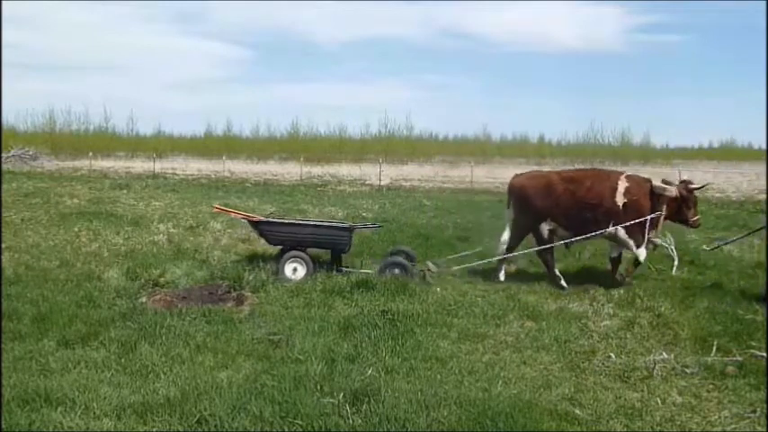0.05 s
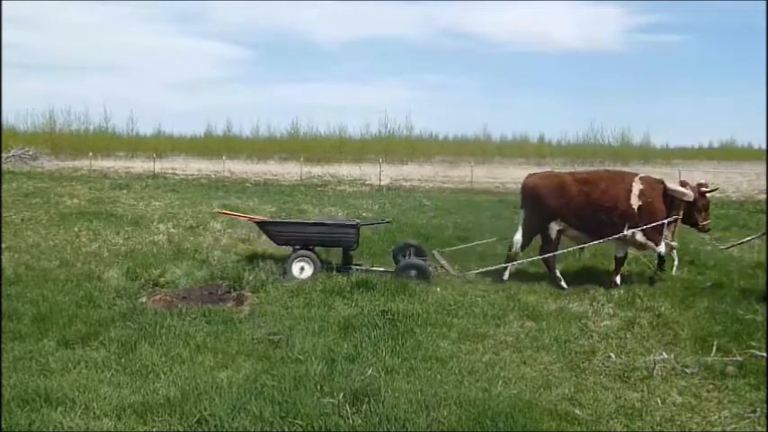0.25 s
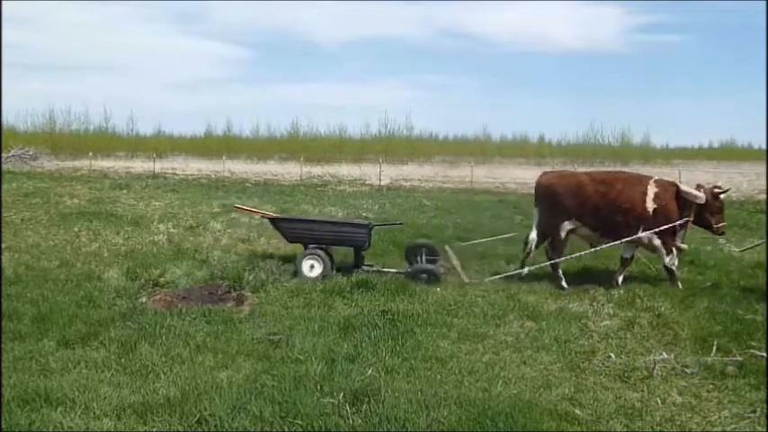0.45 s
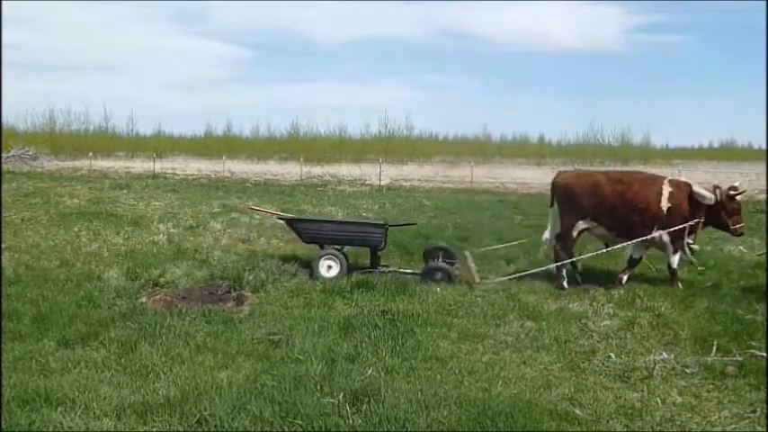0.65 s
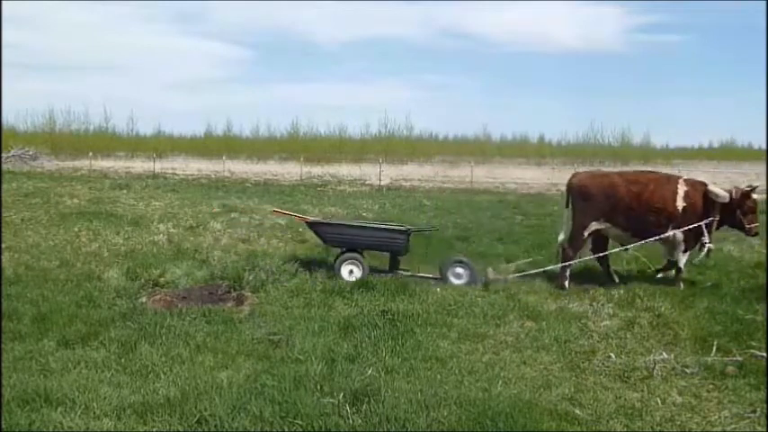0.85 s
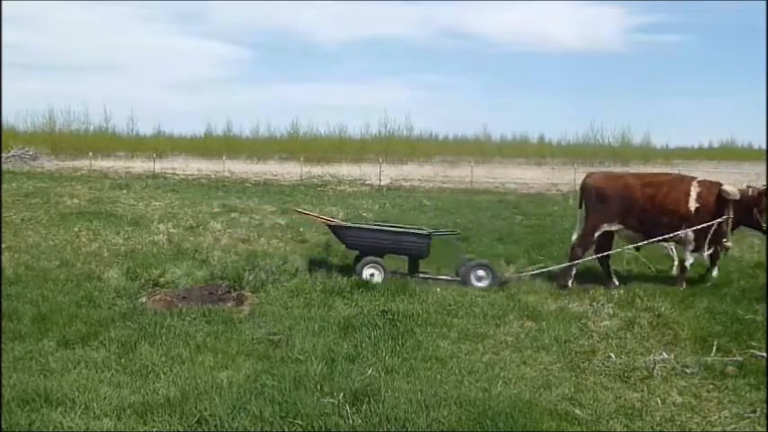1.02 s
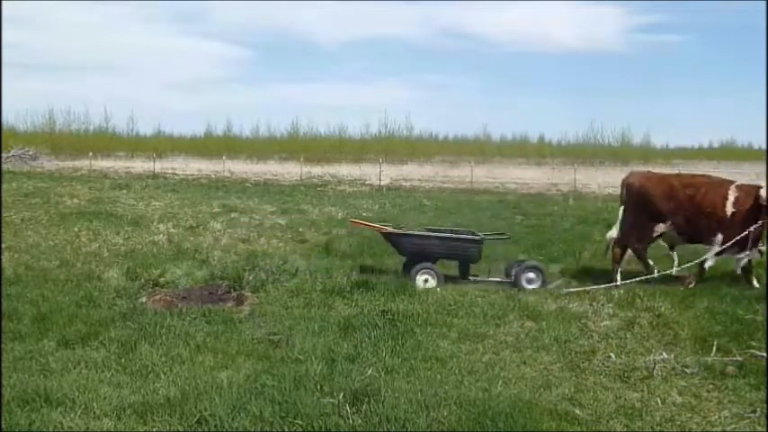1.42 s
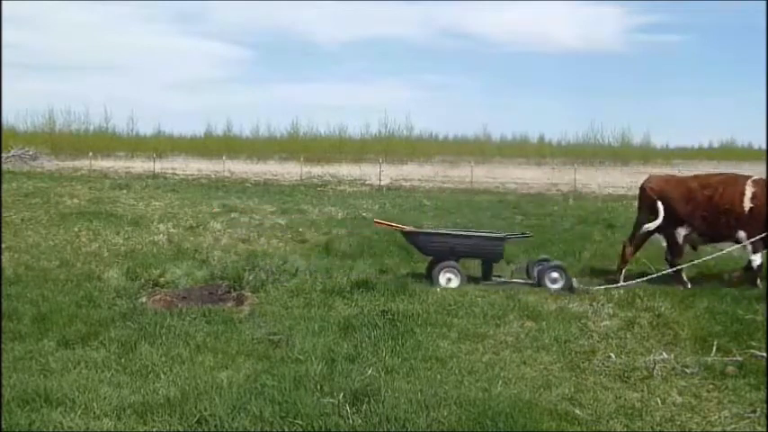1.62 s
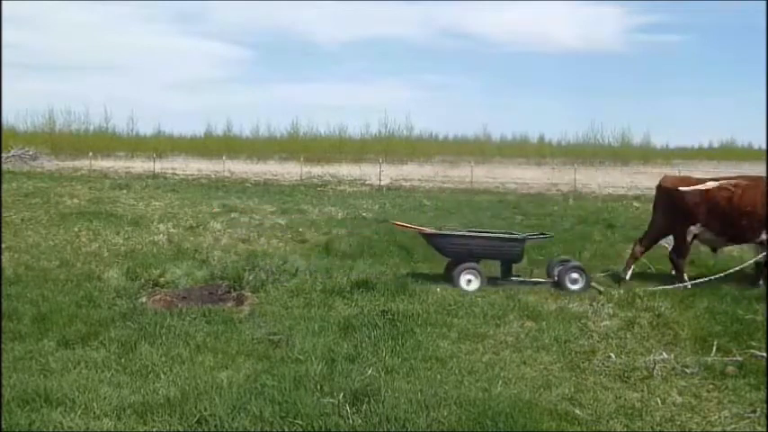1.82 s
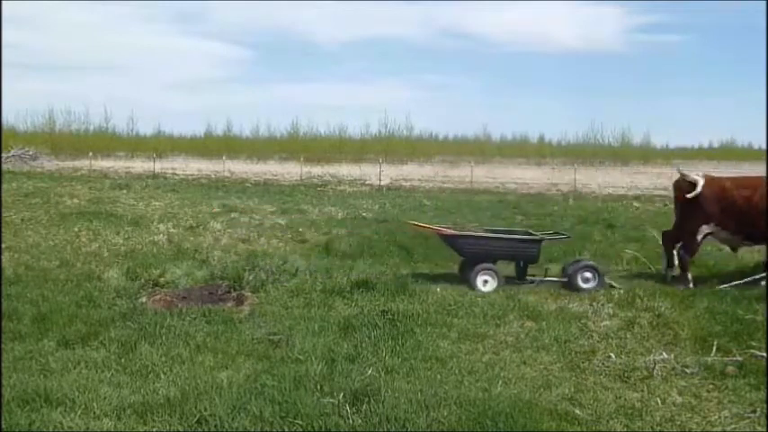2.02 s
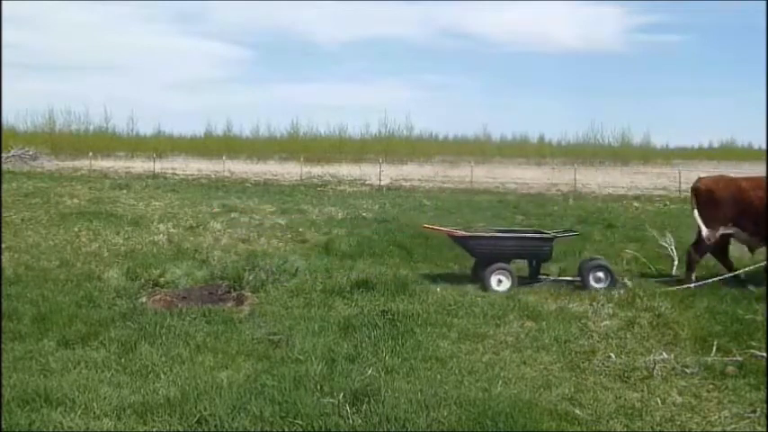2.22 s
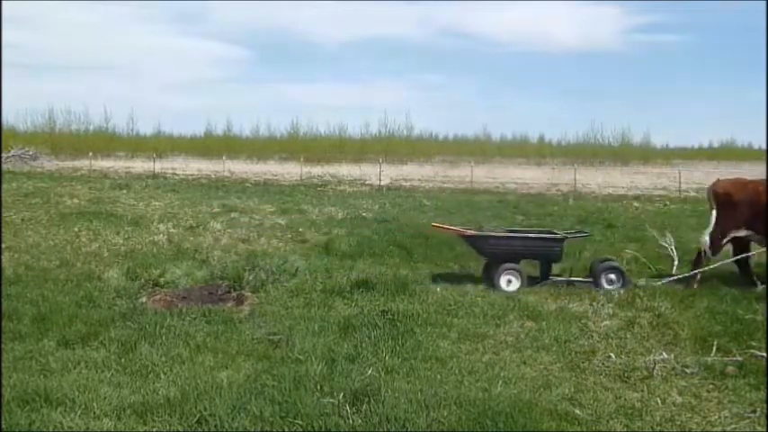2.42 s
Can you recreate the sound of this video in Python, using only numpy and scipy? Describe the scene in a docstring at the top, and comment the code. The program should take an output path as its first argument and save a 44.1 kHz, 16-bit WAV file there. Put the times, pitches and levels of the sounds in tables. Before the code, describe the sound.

A small cart clanks and rattles as an ox pulls it over crackling grass, some way off in an open field. Wind rumbles and pops on the microphone, strongest early, then the clatter grows busier. Birds chirp faintly.

```python
"""A small tub cart clanks and rattles as an ox pulls it over grass, some way off in an open field.
Impacts excite the modes of its frame and make the tub boom; steel fittings ping, and stalks crackle
under wheels and hooves. Turbulent wind rumbles, flutters and pops on the microphone, overloading it
at its strongest. Birds whistle and chirp faintly."""
import sys
import numpy as np
from scipy import signal
from scipy.fft import rfft, irfft
from scipy.io import wavfile
from scipy.ndimage import uniform_filter1d

SR = 44100
rng = np.random.default_rng(int(sys.argv[2]) if len(sys.argv) > 2 else 0)


def log_audio(samples):
    """Write samples as a 16-bit WAV file to the path given in sys.argv[1]."""
    # one column per channel
    frames = np.atleast_2d(samples).T
    # limit to full scale, then quantise
    limited = np.clip(frames, -1, 1)
    pcm = np.round(limited * 32767).astype(np.int16)
    wavfile.write(sys.argv[1], SR, pcm)


N = 112454
T = np.arange(N) / SR

# spectrum of the bright edge of steel contacts (frequency [Hz], level [dB])
EDGE_SPECTRUM = [(2000, -35.5), (4200, 5.5), (5000, 8.5), (6000, 7), (7400, 1.5), (8200, -25)]
# spectrum of rough turbulence on the microphone (frequency [Hz], level [dB])
TURBULENCE_SPECTRUM = [(50, -25), (110, -4.5), (170, 1), (240, 3), (320, -6.5), (420, -21), (600, -31),
                       (1000, -54.5), (2500, -69)]


def undb(db):
    """Decibels to amplitude ratio."""
    return 10 ** (np.asarray(db) / 20)


def unit(x):
    """Normalisation to rms 1."""
    return x / np.sqrt(np.mean(x ** 2))


def curve(rows, column=1):
    """Linear interpolation of a table column over time."""
    rows = np.array(rows)
    return np.interp(T, rows[:, 0], rows[:, column])


def colour(x, spectrum):
    """Spectral shaping by (frequency [Hz], level [dB]) points, to rms 1."""
    hz, db = np.array(spectrum).T
    bin_hz = np.maximum(np.fft.rfftfreq(N, 1 / SR), 1)
    gain = undb(np.interp(np.log(bin_hz), np.log(hz), db))
    return unit(irfft(rfft(x) * gain, N))


def noise():
    """Gaussian white noise."""
    return rng.standard_normal(N)


def walk(rate_hz):
    """Smooth random fluctuation of rms 1."""
    step = max(int(SR / rate_hz), 1)
    return unit(uniform_filter1d(noise()[np.arange(N) // step], step))


def spell(start, length, edge_s):
    """Trapezoidal envelope: rise, hold and fall."""
    return np.clip((T - start) / edge_s + .5, 0, 1) * np.clip((start + length - T) / edge_s + .5, 0, 1)


def strike(start, attack_s, t60_s):
    """Impact envelope: linear rise, exponential decay."""
    age = np.maximum(T - start, 0)
    return np.minimum(age / attack_s, 1) * np.exp(-np.log(1000) * np.maximum(age - attack_s, 0) / t60_s)


def grains(per_s, spread_db):
    """Shot noise: dense tiny contacts of unequal size."""
    hit = rng.random(N) < per_s / SR
    return unit(hit * noise() * undb(spread_db * np.minimum(rng.exponential(size=N), 4)))


def convolve(x, response):
    """Convolution with the first quarter second of an impulse response, scaled to unit energy."""
    response = response[:SR // 4]
    return signal.fftconvolve(x, response / np.linalg.norm(response))[:N]


def scattered(x):
    """Scattering by ground and brush adds a short smear to a distant sound."""
    return x + undb(-1) * convolve(x, noise() * strike(0, attack_s=0.00097, t60_s=0.054))


def grass():
    """Stalks crackling under wheels and hooves sum to shot noise, over the even hiss of the field."""
    # strength of the rustle (time [s], level [dB])
    rolling = [(0, -42), (.2, -48), (.32, -47.5), (.44, -43.5), (.55, -56.5), (.85, -54), (1.0, -46),
               (1.3, -43.5), (1.4, -50), (1.7, -41), (1.83, -45.5), (2.05, -44.5), (2.3, -47),
               (2.55, -49.5)]
    # spectra of the stalks and of the hiss (frequency [Hz], level [dB])
    stalk_spectrum = [(300, 6), (600, 3), (1200, -1.5), (2000, -6), (3300, -9.5), (5000, -12),
                      (7000, -14.5), (8200, -28.5)]
    field_spectrum = [(100, -6.5), (400, 3.5), (1200, -2), (2000, -3), (3500, -7), (6000, -1.5),
                      (8000, -12.5)]
    crackle = colour(grains(per_s=5000, spread_db=1), stalk_spectrum)
    rustle = crackle * undb(curve(rolling) + 0.48 * walk(50))
    return rustle + undb(-61) * colour(noise(), field_spectrum)


def wind_rumble():
    """Turbulent pressure on the microphone rumbles; its rough part grows faster than the rumble does."""
    # strength of the rumble (time [s], level [dB])
    strength = [(0, -35.5), (.15, -34), (.22, -27.5), (.26, -33.5), (.4, -25.5), (.6, -24), (.7, -34),
                (.79, -29), (.9, -30), (1.1, -28.5), (1.2, -24.5), (1.26, -33.5), (1.33, -26.5), (1.4, -31),
                (1.46, -27), (1.73, -28), (1.8, -32), (1.91, -28.5), (1.98, -38.5), (2.1, -37), (2.23, -31),
                (2.32, -41), (2.45, -32.5), (2.55, -37.5)]
    # spectrum of the rumble (frequency [Hz], level [dB])
    spectrum = [(15, 2), (30, -15), (60, 0.5), (120, 2), (180, -5.5), (260, -22.5), (400, -30), (800, -63)]
    rough_growth, reference_db = 2.87, -28.5  # growth in dB per dB of rumble
    rumble_db = curve(strength) + 1.13 * walk(30.18)
    rough_db = -40 + rough_growth * (rumble_db - reference_db)
    rough = undb(rough_db) * colour(noise(), TURBULENCE_SPECTRUM)
    return undb(rumble_db) * colour(noise(), spectrum) + rough


def cart():
    """Impact excitation: blows and rattles sound steel and tub; a blow rings modes near its note most."""
    # blows of hitch and tub (time [s], level [dB], relative tub boom [dB], relative bright edge [dB],
    # note [Hz], relative ring [dB])
    clanks = [(0.017, -41, -26, -2, 2530, 3), (0.269, -54.5, 17, -14, 1500, 7.5),
              (0.441, -39.5, 10, -25, 3560, -9.5), (0.603, -43.5, -15, -2, 3205, -10.5),
              (.874, -57.5, 17, -10, 1160, 9), (1.02, -38, -17, -5, 2630, -2),
              (1.078, -45, -15, -3, 6540, -21), (1.088, -34.5, -11, -15.5, 2920, -2),
              (1.103, -46, 12, -16, 1160, 6), (1.238, -35, -1.5, -16, 1160, 3.5),
              (1.253, -40.5, 10, -11, 1230, -5), (1.296, -46, -9, -13, 3060, -12),
              (1.395, -46.5, 2, -11, 6000, -4.5), (1.435, -34, -24, -9, 3560, 0),
              (1.444, -37.5, 5.5, -2.5, 6540, -4.5), (1.484, -38.5, -4, -14, 4810, -5),
              (1.508, -32.5, 2.5, -10, 3060, -3.5), (1.582, -39, 3, 4, 5400, 1.5),
              (1.594, -44, 1, -13, 4525, 1), (1.624, -40.5, 11, -22, 1540, 1),
              (1.648, -45.5, 11, -22, 3205, 3), (1.672, -42.5, 8, -17, 1230, 9.5),
              (1.7, -30, 0, -3, 3205, 1), (1.706, -32, 5, -6, 4525, -2.5), (1.74, -38, 11, -4, 1490, -6.5),
              (1.798, -46, -16, -3, 4810, -7), (1.883, -30.5, 0, -3, 5070, -6),
              (1.979, -40.5, 2.5, -15, 1230, 5), (2, -37.5, -10, -7, 2920, 1),
              (2.021, -37.5, 0, -8, 3205, 1), (2.048, -40, 4, -24, 2550, -3), (2.152, -38, 0, 1.5, 3560, 2),
              (2.155, -42, -12, -14, 1500, 11.5), (2.185, -43.5, 9, 0, 6460, -1),
              (2.25, -50, -6, 6, 4810, 2), (2.496, -44.5, -2, 6, 5290, 0)]
    # loose rattling as the wheels jolt (time [s], duration [s], level [dB])
    rattles = [(0.177, 0.03, -50.5), (1.113, 0.021, -47.5), (1.464, 0.082, -45.5), (1.583, 0.1, -42),
               (1.725, 0.028, -37.5), (1.861, 0.041, -45.5), (2.16, 0.028, -44.5)]
    # modes of the frame (frequency [Hz], level [dB])
    frame_modes = [(1160, 14.5), (1230, 2), (1540, 9.5), (2550, 0.5), (2920, 7), (3060, -8), (3205, 6.5),
                   (3560, -2.5), (4525, -4.5), (4810, -2.5), (5070, -10), (5900, -7.5), (6540, -4)]
    # spectra of the steel's clatter and the tub's boom (frequency [Hz], level [dB])
    steel_spectrum = [(500, -4), (1500, 7), (2400, 9.5), (3300, 12), (4600, 6), (6000, -1), (7300, -20),
                      (8200, -32.5)]
    tub_spectrum = [(250, 1.5), (500, -2), (900, -11.5), (1200, -6.5), (1700, -14.5), (2400, -17),
                    (4000, -26.5), (8000, -53)]
    attack_s, mode_width_hz, excited_half_width_hz = 0.0013, 68, 110
    steel_power, tub_power, edge_power, struck = np.zeros((4, N))
    mode_hz, mode_db = np.array(frame_modes).T
    modes = np.sin(2 * np.pi * (mode_hz[:, None] * T + rng.random((len(mode_hz), 1))))
    for start, db, boom_db, edge_db, note_hz, ring_db in clanks:
        blow = lambda t60_s: undb(db) * strike(start, attack_s, t60_s)
        steel_power += blow(t60_s=0.08) ** 2
        tub_power += (undb(boom_db) * blow(t60_s=0.14)) ** 2
        edge_power += (undb(edge_db) * blow(t60_s=0.058)) ** 2
        share = undb(mode_db) / (1 + ((mode_hz - note_hz) / excited_half_width_hz) ** 2)
        ring = blow(t60_s=0.085) * (share / np.linalg.norm(share) @ modes)
        clack = undb(-3) * blow(t60_s=0.033) * np.sin(2 * np.pi * note_hz * (T - start))
        struck += undb(ring_db) * (clack + ring)
    for start, length, db in rattles:
        shake = undb(db) * spell(start, length, edge_s=0.0087)
        steel_power += shake ** 2
        tub_power += (undb(4.5) * shake) ** 2
    chatter = unit(undb(0.78 * walk(261.6)))
    steel = np.sqrt(steel_power) * colour(grains(per_s=2200, spread_db=1), steel_spectrum)
    frame_response = undb(mode_db) @ modes * np.exp(-np.pi * mode_width_hz * T)
    frame = undb(-5.5) * convolve(np.sqrt(steel_power) * noise(), frame_response)
    edge = np.sqrt(edge_power) * colour(noise(), EDGE_SPECTRUM)
    tub = np.sqrt(tub_power) * colour(grains(per_s=3300, spread_db=3), tub_spectrum)
    return chatter * (steel + edge + tub) + frame + struck


def eddy_pops():
    """Each eddy on the microphone is a pressure transient: two damped tones and a puff of noise. A small knock
    on the tub at 1.845 s is made the same way."""
    # eddies, and at 1.845 s a small knock on the tub (time [s], level [dB], frequency [Hz], relative level of
    # upper tone and puff [dB])
    eddies = [(.02, -32.5, 328, -17), (0.444, -8, 192, -7.5), (0.513, -15.5, 185, -11.5),
              (0.566, -27, 258, -3.5), (.608, -6, 221, -15), (.874, -20.5, 179, -7.5),
              (1.002, -15.5, 203, -8.5), (1.084, -14, 115.5, -42), (1.163, -23.5, 175, -1.5),
              (1.184, -17, 206, -2.5), (1.288, -13.5, 223, -8), (1.31, -19, 147, -24),
              (1.468, -19, 279, -13.5), (1.609, -8, 206, -1), (1.621, -21.5, 229, -3),
              (1.845, -33, 310, -1), (1.902, -18, 145, -25), (1.928, -17.5, 115, -25),
              (2.247, -21, 93, -22), (2.259, -14, 208, 0.5), (2.431, -21.5, 109, -16),
              (2.491, -22, 99, -33)]
    # spectrum of the puff (frequency [Hz], level [dB])
    puff_spectrum = [(150, -16.5), (400, 0), (700, 1.5), (900, -7.5), (1500, -17), (4000, -58.5)]
    rises_s, upper_ratio = (0.0033, 0.0027), 1.797
    puff = undb(-13.5) * colour(noise(), puff_spectrum)
    out = np.zeros(N)
    for start, db, hz, upper_db in eddies:
        age = np.clip(T - start, 0, .2)
        low_pulse, upper_pulse = (age / rise * np.exp(1 - age / rise) for rise in rises_s)
        phase = 2 * np.pi * hz * age
        upper = undb(upper_db) * upper_pulse * (np.sin(upper_ratio * phase) + puff)
        out += undb(db) * (low_pulse * np.sin(phase) + upper)
    return out


def bird_whistles():
    """Fast random frequency modulation makes a far bird's falling whistles husky."""
    # whistles (time [s], duration [s], first frequency [Hz], last frequency [Hz], level [dB])
    whistles = [(0.042, 0.084, 3850, 3140, -54), (0.152, 0.076, 4080, 4044, -46.5),
                (0.214, 0.037, 3790, 2860, -53), (0.345, 0.048, 4100, 3000, -56),
                (2.077, 0.13, 4070, 3945, -57)]
    waver = 1 + .021 * walk(1000)
    out = np.zeros(N)
    for start, length, from_hz, to_hz, db in whistles:
        hz = np.interp(T, [start, start + length], [from_hz, to_hz]) * waver
        out += undb(db) * spell(start, length, edge_s=0.028) * np.sin(2 * np.pi * np.cumsum(hz) / SR)
    return out


def fittings():
    """Damped vibration: each small steel part scrapes and pings on one slightly unsteady note."""
    # pings (time [s], frequency [Hz], level [dB], 60 dB decay time [s], attack [s])
    pings = [(0.07, 7165, -34, 0.052, 0.0023), (0.603, 7000, -46, 0.072, 0.0016),
             (1.166, 5444, -39, 0.15, 0.0096), (1.669, 7130, -44.5, 0.089, 0.0049)]
    phase_per_hz = 2 * np.pi * np.cumsum(1 + 0.0064 * walk(250)) / SR
    scrape = undb(-15.5) * colour(noise(), EDGE_SPECTRUM)
    return sum(undb(db) * strike(start, attack, t60) * (np.sin(hz * phase_per_hz) + scrape)
               for start, hz, db, t60, attack in pings)


def gust_flutter():
    """Gusts make the pressure on the microphone oscillate at a wandering rate, amid turbulence."""
    # gusts (time [s], duration [s], level [dB], flutter [Hz], relative turbulence [dB])
    gusts = [(0.314, 0.044, -13.5, 145, -12), (0.362, 0.017, -20, 165, -35),
             (0.419, 0.029, -12, 160, -10.5), (0.47, 0.0694, -16.5, 172.5, -3.5),
             (0.546, 0.048, -22, 197.8, 1.5), (0.763, 0.074, -27.5, 171.2, -26),
             (1.7, 0.029, -20, 133.9, -3)]
    phase_per_hz = 2 * np.pi * np.cumsum(np.exp(0.1533 * walk(260))) / SR
    surge = unit(undb(0.5 * walk(110)))
    rough = colour(noise(), TURBULENCE_SPECTRUM)
    out = np.zeros(N)
    for start, length, db, hz, rough_db in gusts:
        flutter = np.sqrt(2) * surge * np.sin(hz * phase_per_hz)
        out += undb(db) * spell(start, length, edge_s=0.0059) * (flutter + undb(rough_db) * rough)
    return out


def bird_chirp():
    """A near bird's short chirp is a harmonic series on a rising, then falling fundamental."""
    # course of the chirp (time [s], frequency [Hz], level [dB])
    contour = [(.749, 2230, -64), (.756, 2237, -38.5), (.768, 2300, -35.5), (.785, 2316, -46.5),
               (.805, 2220, -57)]
    # harmonics from the fundamental upward (relative level [dB])
    harmonics = [0, -12.5, -23]
    hz = curve(contour) * (1 + 0.0051 * walk(280))
    phase = 2 * np.pi * np.cumsum(hz) / SR
    tone = sum(undb(db) * np.sin(k * phase) for k, db in enumerate(harmonics, 1))
    sounding = (T > contour[0][0]) & (T < contour[-1][0])
    return tone * undb(curve(contour, column=2)) * sounding


def scene():
    """Superposition of cart, birds, grass and wind at one microphone."""
    field = cart() + scattered(fittings()) + bird_chirp() + scattered(bird_whistles()) + grass()
    wind = wind_rumble() + gust_flutter() + eddy_pops()
    return (field + wind)[None]


def record(dry):
    """Soft saturation: the strongest wind overloads the microphone; a low-pass filter cuts the top."""
    ceiling, cutoff_hz = .44, 7900
    saturated = dry / (1 + (dry / ceiling) ** 6) ** (1 / 6)
    return signal.sosfilt(signal.ellip(8, .2, 70, cutoff_hz, fs=SR, output="sos"), saturated)


dry = scene()
out = record(dry)
log_audio(out)
```